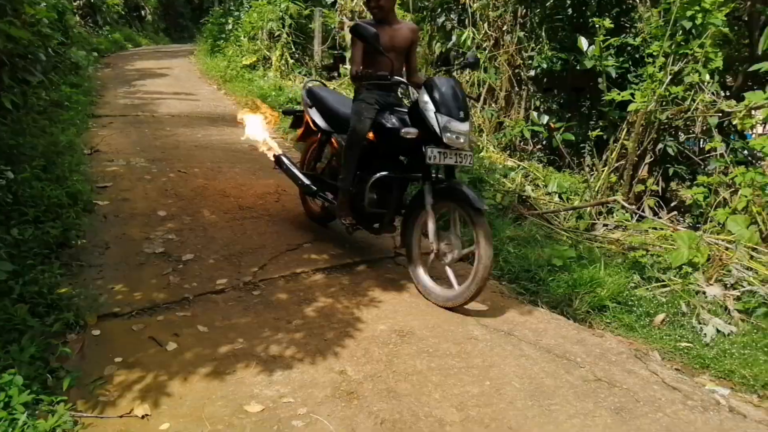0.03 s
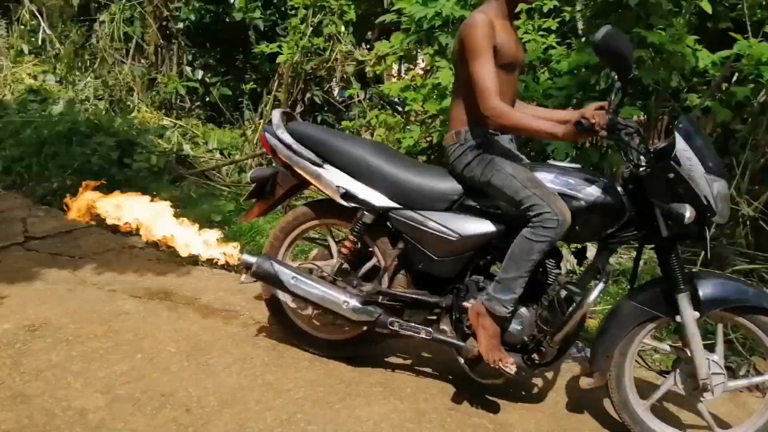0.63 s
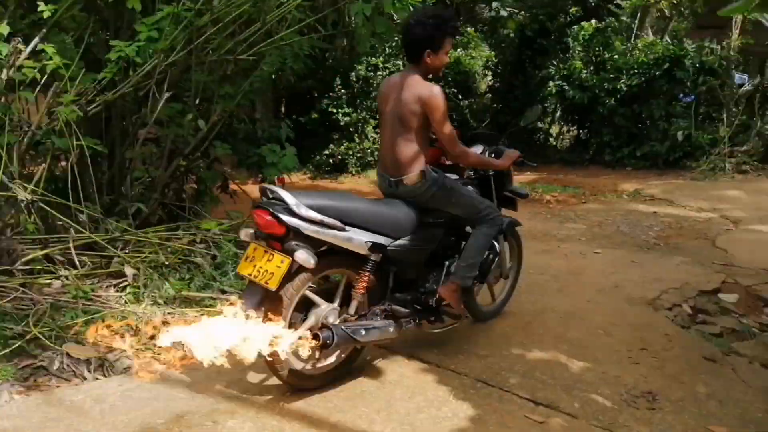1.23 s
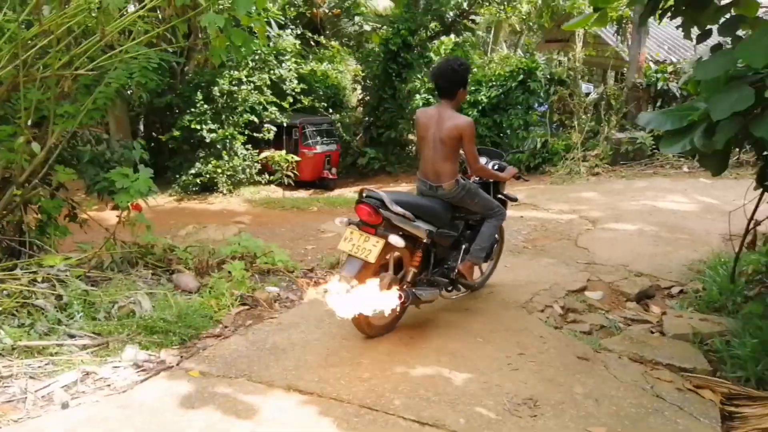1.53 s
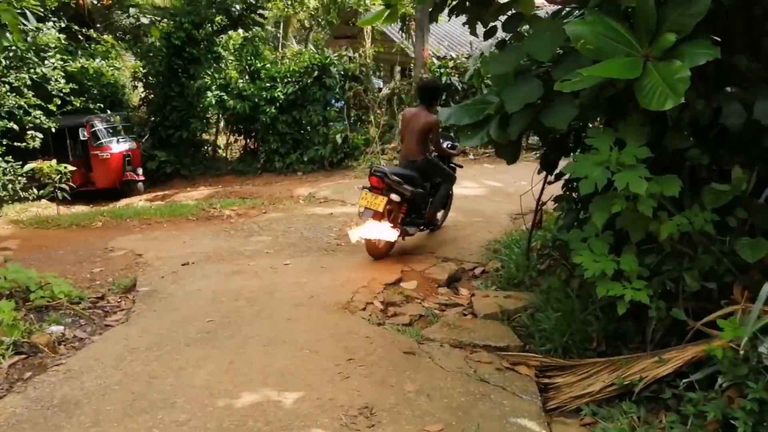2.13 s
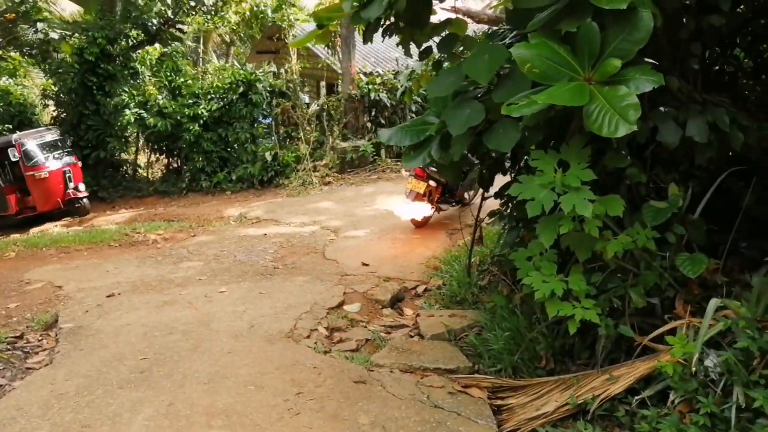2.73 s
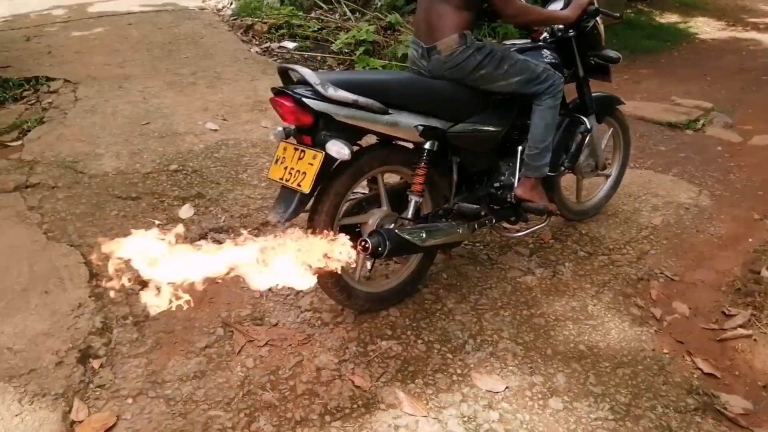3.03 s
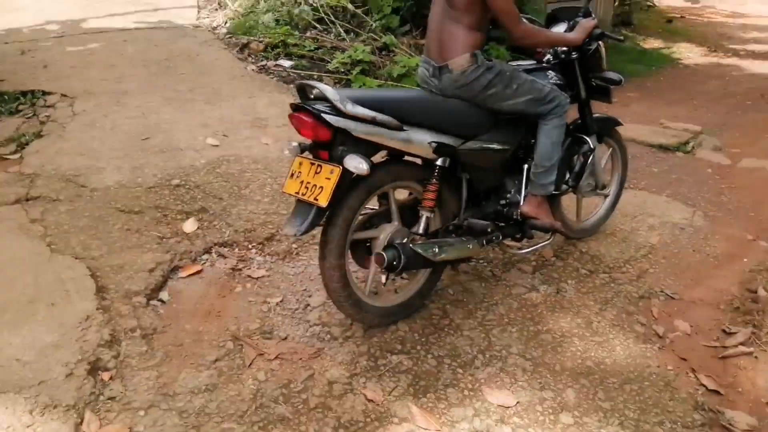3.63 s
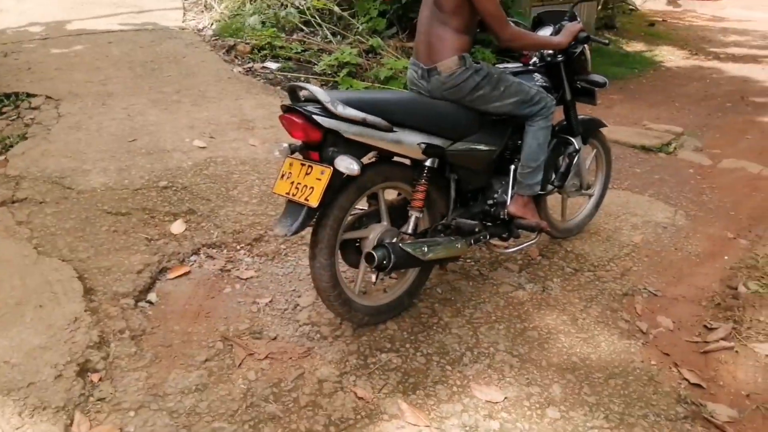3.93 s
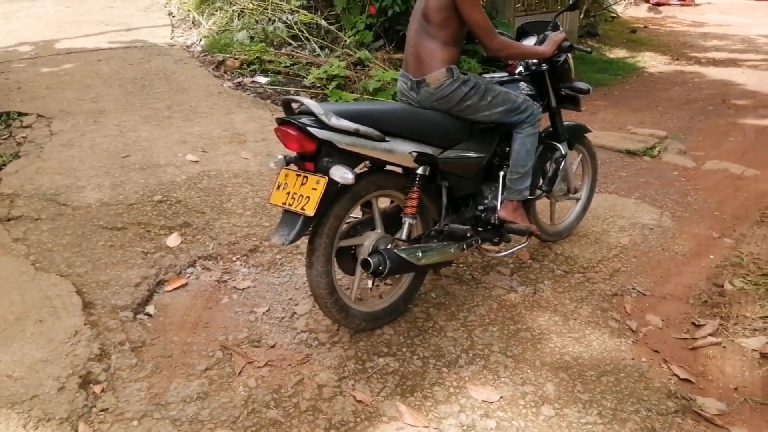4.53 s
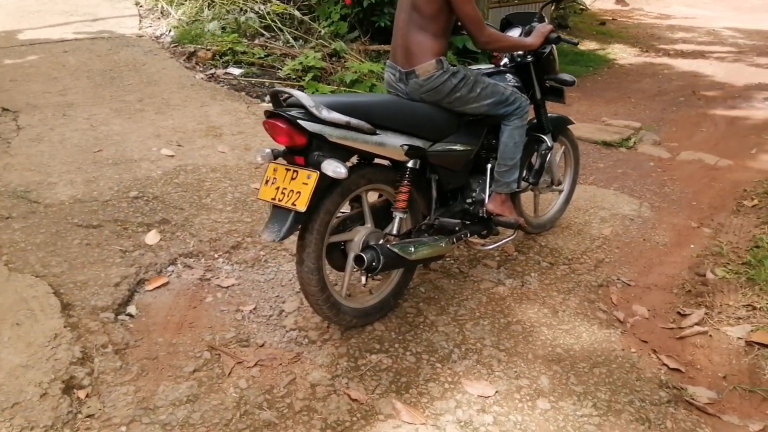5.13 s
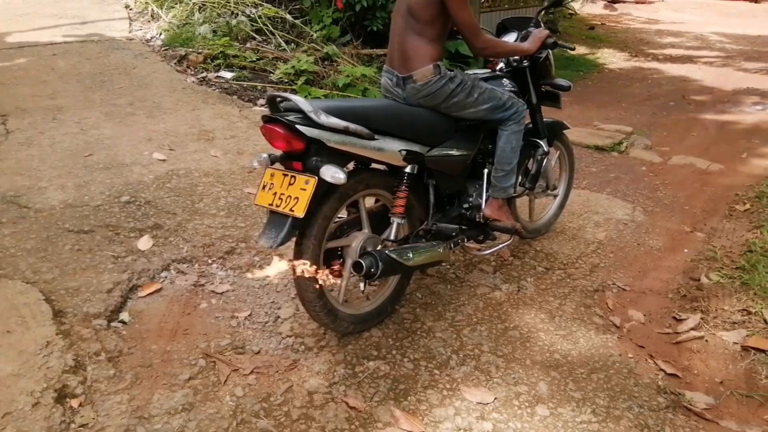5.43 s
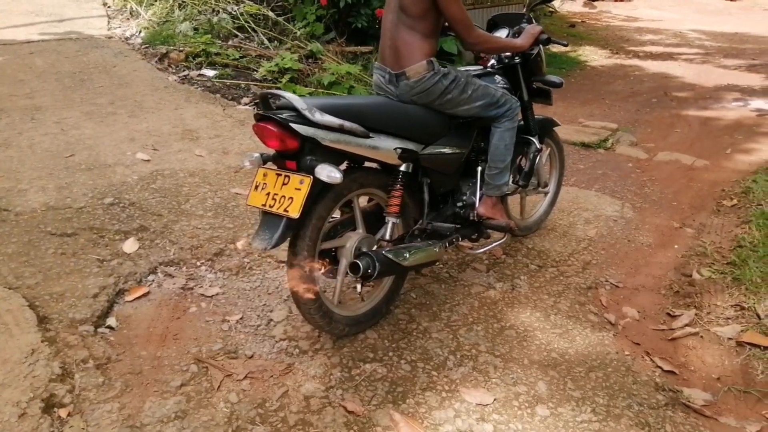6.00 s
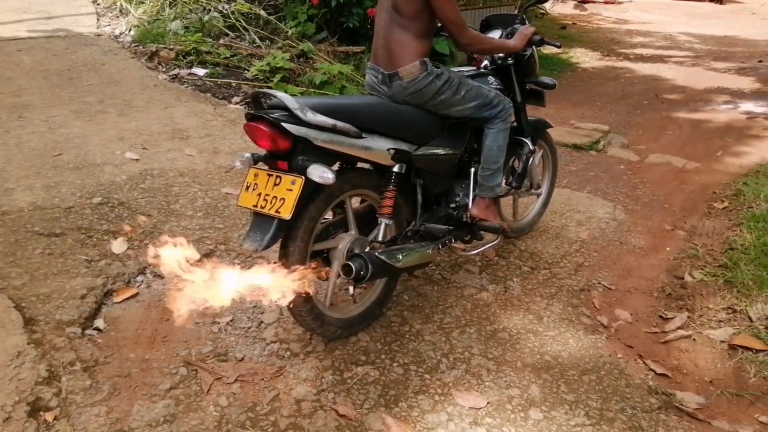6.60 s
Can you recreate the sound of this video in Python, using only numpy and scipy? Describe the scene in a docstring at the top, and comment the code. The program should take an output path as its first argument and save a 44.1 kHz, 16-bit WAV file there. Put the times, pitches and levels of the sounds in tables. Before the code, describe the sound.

A single-cylinder motorcycle fades in, puttering slowly past outdoors with clattering valves, a faint metallic ring and a low rumble of burning exhaust gas. It is closest just before 1 second, then moves away, giving soft double or triple pops around 1 and 2.1 seconds.

At about 2.8 seconds the sound cuts abruptly to the bike standing close by. The exhaust stutters with fiery pops, bangs at 2.9 and louder at 3.4, then crackles hard until 3.7. Meanwhile the engine is revved once, rising with a metallic rasp to a peak near 4 seconds. The throttle snaps shut and the pitch sinks gradually, with a humming tone and a thin gear whine.

From 5.3 seconds the sputtering returns over the slowing engine. A sharp backfire comes at 6.2, and four loud bangs follow quickly between 6.6 and 6.8, slightly overloading the microphone.

```python
"""A one-cylinder four-stroke motorcycle spits flames: it rolls past, then, after a sudden cut, stands
close by and is revved. Each engine cycle makes a puff of exhaust and a gulp of intake air, over
clattering valves; on the standing bike a gear also whines. Unburnt fuel lights in the silencer, in
stuttering runs and single bangs. The loudest bangs overload a phone's two microphones."""
import sys
import numpy as np
from scipy import signal
from scipy.fft import rfft, irfft, next_fast_len
from scipy.io import wavfile
from scipy.ndimage import uniform_filter1d

SR = 44100
rng = np.random.default_rng(int(sys.argv[2]) if len(sys.argv) > 2 else 0)


def persist_wave(psi):
    """Save psi, clipped to +-1, as 16-bit WAV."""
    counts = np.round(np.clip(psi, -1, 1) * 32767).astype(np.int16)
    wavfile.write(sys.argv[1], SR, np.atleast_2d(counts).T)


N = 298116
T = np.arange(N) / SR
STANDING_FROM_S = 2.772
REFERENCE_HZ = 50  # engine cycles a second; levels that follow the speed are set for this one

# Tone of burning gas: f/Hz, level/dB
FLAME_TONE = [(60, -31), (200, 9), (310, -15.5), (400, -1), (540, -2), (660, -2.5), (920, -13.5),
              (1200, -8.5), (1500, -17), (1900, -9.5), (2800, -35), (5000, -28), (15000, -46)]
# Tone of gas cracking out of the pipe: f/Hz, level/dB
CRACK_TONE = [(100, -52), (500, 14), (1500, -5.5), (3000, -4.5), (6000, -10), (10000, -14.5),
              (16000, -22.5)]
# Thin metal rings: start/s, end/s, f/Hz, bandwidth/Hz, level/dB, moment of the hit/cycles
METAL_RINGS = [(0.45, 1.95, 980, 170, -41, 0.1), (2.52, 2.77, 1560, 220, -45, -0.23),
               (2.88, 3.42, 1790, 160, -33, -0.43), (6.06, 6.24, 1090, 160, -35, -0.2)]
# Single backfires: t/s, thump level/dB, thump width/ms, crack level/dB
BACKFIRES = [(1.031, -12.5, 2.7, -43), (1.061, -14, 1.7, -33), (2.055, -18.5, 0.97, -59),
             (2.083, -13.5, 1.6, -61), (2.113, -18, 2.2, -54), (2.912, -1, 2.1, -27), (3.415, -7, 3.8, -15),
             (3.439, 5, 1.73, -17), (6.164, 0, 1.8, -20), (6.604, 3, 2.15, -15), (6.669, 1, 2.19, -16.5),
             (6.727, 4, 1.95, -18), (6.755, 1, 2.15, -16.5)]
# Runs of flares in the silencer: start/s, end/s, thump level/dB, flame level/dB,
# spit against flame/dB, exhaust boost/dB, thump width/ms, lean of the thump's wave
FLARE_RUNS = [(2.835, 3.405, -17.5, -18.5, -7.5, 7, 3.25, -0.62),
              (3.475, 3.697, -6.5, -8.5, -4.5, 12, 2.2, 0.4),
              (5.335, 5.778, -20.5, -20, -6, 9.5, 2.23, 0.42),
              (5.772, 6.068, -15, -15.5, -7.5, 6.5, 2.2, 0.49),
              (6.149, 6.57, -10.5, -15.5, -7.5, 3.5, 2.15, 0.26),
              (6.616, 6.761, -14, -14, -6.5, 2, 2.9, 0.34)]


def undb(db):
    """Turn decibels into a gain."""
    return 10 ** (np.asarray(db) / 20)


def unit(x):
    """Scale a signal to an average (rms) level of 1."""
    return x / np.sqrt(np.mean(x ** 2))


def noise():
    """White noise: an even hiss."""
    return rng.standard_normal(N)


def colour(x, tone):
    """Shape a sound by (f/Hz, level/dB) points; the filter rings only after a hit, never before."""
    size = next_fast_len(N + SR // 2)
    hz, db = np.transpose(tone)
    bin_hz = np.fft.rfftfreq(size, 1 / SR)
    log_gain = np.log(undb(np.interp(np.log(bin_hz + 1), np.log(hz), db)))
    # move the early half of the filter's response to after the hit
    cepstrum = irfft(log_gain, size) * (1 + np.sign(size / 2 - np.arange(size)))
    cepstrum[0] /= 2
    return irfft(rfft(x, size) * np.exp(rfft(cepstrum, size)), size)[..., :N]


def hiss(tone):
    """Noise of level 1 with the given tone."""
    return unit(colour(noise(), tone))


def spread(middle, other, split_hz=2300):
    """Left and right channels: alike in the bass, unrelated in the treble."""
    side = signal.sosfilt(signal.butter(1, split_hz, "high", fs=SR, output="sos"), other)
    return np.array([middle + side, middle - side])


def bump(u):
    """A bell-shaped swell around u = 0."""
    return np.exp(-u ** 2 / 2)


def strike(u):
    """The outline of a hit: starts at u = 0, peaks at u = 1, then dies away."""
    age = np.maximum(u, 0)
    return age * np.exp(1 - age)


def each_cycle(cycles, phase, scatter_db):
    """Seconds since the nearest once-a-cycle event (negative before it), and its random strength."""
    nearest = np.round(cycles[0] - phase).astype(int)
    since = (cycles[0] - phase - nearest) / cycles[1]
    return since, undb(scatter_db * rng.standard_normal(1024))[nearest]


def puff(u, lean=0.):
    """The pressure wave of a gas burst: push, deep dip, push. u is in widths; lean makes it lopsided."""
    return (u ** 2 - 1 + lean * u) * bump(u)


def puff_gain(hz, width_s):
    """The gain that brings hz puffs a second to an average level near 1."""
    return 1 / np.sqrt(hz * width_s * np.sqrt(np.pi) * 3 / 4)


def exhaust_and_intake(cycles, phase, width_ms, lean, edge, gas, intake, intake_ms, lag, scatter_db):
    """A puff of exhaust with its rush of gas, then, lag cycles later, a gulp of intake air."""
    since, strength = each_cycle(cycles, phase, scatter_db)
    u = since * 1000 / width_ms
    rush = gas * bump(u + .5) * hiss(FLAME_TONE)
    exhaust = strength * (puff(u, lean) + edge * puff(1.79 * u) + rush)  # a narrower puff adds edge
    since, strength = each_cycle(cycles, phase + lag, scatter_db)
    gulp = intake * strength * puff(since * 1000 / intake_ms)
    return (exhaust + gulp) * puff_gain(cycles[1], width_ms / 1000)


def burning_jet(facing):
    """The jet of burning gas rumbles; its higher bark is heard from behind the pipe."""
    # Tones of the rumble and the bark: f/Hz, level/dB
    rumble_tone = [(20, -21), (50, -3), (110, 0.5), (230, 0.5), (330, -6), (560, -24.5), (2000, -53)]
    bark_tone = [(180, -24), (380, 2.5), (450, -5.5), (560, -25), (2000, -46)]
    rumble = spread(hiss(rumble_tone), hiss(rumble_tone), split_hz=1200)
    return undb(-1) * rumble + undb(-10.5) * facing ** 3 * hiss(bark_tone)


def metal_taps(cycles):
    """Metal parts touch at the same 160 points of every cycle, never quite equally hard."""
    count, _ = cycles
    phases, strengths = rng.random(160), rng.standard_normal(160)
    tap_counts = (np.arange(int(count[-1]))[:, None] + phases).ravel()
    tap_s = np.interp(tap_counts, count, T)
    taps = np.bincount((tap_s * SR).astype(int), np.resize(strengths, len(tap_s)), N)
    return unit(taps * undb(3 * noise()))


def case_ringing(x):
    """The engine case and pipe ring at their own pitches when shaken."""
    # Resonances of the case and pipe: f/Hz, bandwidth/Hz, level/dB
    resonances = [(1320, 700, -26), (1880, 78, -2.5), (3160, 16, 12), (3660, 44, 8.5), (4220, 490, 4.5),
                  (4740, 21, 6), (5960, 34, 5.5)]
    return unit(sum(undb(db) * signal.lfilter(*signal.iirpeak(hz, hz / width, fs=SR), x)
                    for hz, width, db in resonances))


def clatter(cycles, taps, valve_phase, valve_depth, ring, lowest_hz):
    """Chain, valves and gears tap and hiss, louder when the valves move, and make the case ring."""
    # Tone of the moving parts: f/Hz, level/dB
    parts_tone = [(60, -43), (250, 7), (400, 2), (700, 0.5), (950, -4.5), (1300, -1), (1700, -4.5),
                  (2300, -6.5), (3200, -6), (4500, -11.5), (8000, -13.5), (12000, -19), (16000, -28)]
    since, strength = each_cycle(cycles, valve_phase, scatter_db=5)
    swell = 1 + valve_depth * strength * strike(since / 0.002)
    bass_cut = signal.butter(2, lowest_hz, "high", fs=SR, output="sos")  # small parts give little bass
    shakes = [signal.sosfilt(bass_cut, swell * (taps * metal_taps(cycles) + noise())) for _ in range(2)]
    rattles = [unit(colour(x, parts_tone)) + ring * case_ringing(x) for x in shakes]
    return unit(spread(*rattles)) * np.sqrt(2)


def metal_ring(cycles, start, end, ring_hz, width_hz, db, phase):
    """Metal struck once a cycle gives a thin ring that fades in at start and out at end."""
    since, strength = each_cycle(cycles, phase, scatter_db=2.5)
    age = np.maximum(since, 0)
    ring = np.sin(2 * np.pi * ring_hz * age + 4 * strength) * strike(np.pi * width_hz * age) * strength
    fade = uniform_filter1d(1. * ((T > start) & (T < end)), size=3000)
    return undb(db) * unit(ring) * fade


def rolling_bike():
    """The bike rolls slowly past; as it leaves, its pipe points at the listener."""
    # Engine speed: t/s, cycle rate/Hz
    speed = [(0.0, 42.13), (0.3, 39.97), (0.6, 39.44), (1.0, 38.33), (1.4, 36.95), (1.8, 37.06),
             (2.1, 36.55), (2.4, 37.52), (2.77, 32.34)]
    # Change in the clatter's tone while rolling: f/Hz, gain/dB
    rolling_tone = [(350, -6), (570, -7.5), (800, 3.5), (980, 3.5), (1250, -3.5), (1700, 2.5), (2300, 0.5),
                    (2800, -1.5), (9000, 3), (15000, 1)]
    passes_s, closest_m, metres_per_s = 0.7, 1.7, 3.36
    hz = np.interp(T, *np.transpose(speed))
    cycles = np.cumsum(hz) / SR, hz  # the engine's motion: cycles so far, cycles a second
    along_m = metres_per_s * (T - passes_s)
    distance_m = np.hypot(along_m, closest_m)
    near = closest_m / distance_m
    facing = (1 + along_m / distance_m) / 2  # 0 coming, 1 going: the puffs get louder and sharper
    pipe = exhaust_and_intake(cycles, phase=-0.4145, width_ms=1.46, lean=-0.91, edge=0.25 * facing,
                              gas=0.073, intake=0.6, intake_ms=2.19, lag=0.461, scatter_db=2.2)
    jet = burning_jet(facing)
    metal = clatter(cycles, taps=0.83, valve_phase=0.16, valve_depth=0.33, ring=0.074, lowest_hz=443)
    rings = sum(metal_ring(cycles, *row) for row in METAL_RINGS if row[0] < STANDING_FROM_S)
    exhaust_gain = undb(-27 + 4.5 * (facing - .5)) * near ** 0.71  # carries further than the clatter
    return exhaust_gain * (pipe + jet) + undb(-32) * near * colour(metal, rolling_tone) + rings


def backfires():
    """A whole charge of fuel explodes: a crack of gas at the pipe's mouth, then a flame and a thump."""
    thump, blaze, crack = np.zeros((3, N))
    for at_s, db, width_ms, crack_db in BACKFIRES:
        span = abs(T - at_s) < .06
        since = T[span] - at_s
        thump[span] += undb(db) * puff(since * 1000 / width_ms, lean=0.1)
        blaze[span] += undb(db) * bump((since + 0.0039) / 0.0044)
        crack[span] += undb(crack_db) * strike((since + 0.013) / 0.0066)
    gas = spread(hiss(CRACK_TONE), hiss(CRACK_TONE))
    return thump + undb(-18.5) * blaze * hiss(FLAME_TONE) + crack * gas


def wander(samples):
    """A random drift of size about 1, smoothed over this many samples."""
    return unit(uniform_filter1d(uniform_filter1d(noise(), samples), samples))


def drone(count):
    """The engine's overtones, each wavering on its own, slide through the silencer's resonances."""
    # Engine overtones: multiple of the cycle rate, level/dB
    overtones = [(3, -1), (4, -5.5), (5, -16), (6, -4), (7, -12), (8, -5), (9, -9), (10, -4.5), (11, -11),
                 (12, -5), (13, -12), (14, -11), (16, -10), (17, -4), (18, -9), (21, -14)]
    # Tone of the silencer: f/Hz, gain/dB
    silencer_tone = [(130, 1.5), (185, 7), (230, -1), (300, 3), (430, 4), (620, 3), (800, 2.5), (1000, -2),
                     (1300, -2)]
    hum = 0
    for multiple, db in overtones:
        gain = undb(db + 2 * wander(4000))
        hum += gain * np.sin(2 * np.pi * (multiple * count + rng.random()) + .2 * wander(1000))
    return colour(unit(hum), silencer_tone)


def gear_whine(count, teeth=28):
    """Meshing gear teeth whine, swelling as their pitch slides through a resonance of the case."""
    # Loudness of the whine at each pitch: f/Hz, level/dB
    whine_levels = [(900, -43), (1200, -35.5), (1380, -27), (1500, -41), (2000, -32), (2400, -36.5)]
    angle = 2 * np.pi * count
    return colour(np.sin(teeth * angle + 0.55 * wander(600) + 0.69 * np.sin(angle)), whine_levels)


def afterfire(cycles):
    """Fuel lights in the hot silencer once a cycle: a spit of gas, then a thump with a burst of flame."""
    since, strength = each_cycle(cycles, phase=0., scatter_db=1.8)
    lit_s = T - since
    # no flare where the charge goes off as a single backfire
    spent = np.min([abs(lit_s - bang[0]) for bang in BACKFIRES], axis=0) < .011
    flame = bump((since + 0.001) / 0.0028) * hiss(FLAME_TONE)
    spit = strike((since + 0.0089) / 0.0021) * spread(hiss(CRACK_TONE), hiss(CRACK_TONE))
    flares = 0
    for start, end, thump_db, flame_db, spit_db, _, width_ms, lean in FLARE_RUNS:
        width_s = width_ms / 1000
        thump = undb(thump_db) * puff(since / width_s, lean) * puff_gain(cycles[1], width_s)
        roar = undb(flame_db) * (flame + undb(spit_db) * spit)
        flares += (lit_s > start) * (lit_s < end) * (thump + roar)
    return flares * strength * ~spent


def throttle_blip():
    """Throttle and engine load (0-1) rise together; the throttle snaps shut, the load dies away."""
    opens_s, full_s, released_s = 3.26, 3.74, 3.95
    shut_s, load_fade_s = 0.016, 0.2
    opening = np.clip((T - opens_s) / (full_s - opens_s), 0, 1)
    since = np.maximum(T - released_s, 0)
    return opening * np.clip(1 - since / shut_s, 0, 1), opening * np.exp(-since / load_fade_s)


def combustion_knock(cycles, octaves):
    """Hard-burning fuel raps the case once a cycle; at high speed the rap gains a metallic edge."""
    # Tones of the rap and of its edge: f/Hz, level/dB
    rap_tone = [(200, -23), (700, -19), (1300, 17.5), (1650, -1), (2000, 13.5), (3000, -8), (4500, -7),
                (6500, -25), (10000, -6.5), (16000, -14)]
    edge_tone = [(2500, -34), (3900, -10), (4250, 5.5), (4600, -7), (4900, 0), (5400, -14), (6100, -1.5),
                 (6700, -34), (10000, -28)]
    since, _ = each_cycle(cycles, phase=0.35, scatter_db=0)
    shakes = [metal_taps(cycles) + 1.3 * noise() for _ in range(2)]
    rap = spread(*(unit(colour(x, rap_tone)) + 0.41 * case_ringing(x) for x in shakes))
    edge = spread(*(unit(colour(x, edge_tone)) for x in shakes))
    return (undb(-18) * rap + undb(-41 + 32.5 * octaves) * edge) * strike(since / 0.0024)


def standing_bike():
    """The bike stands close by; it is revved once, then the engine slows down."""
    # Engine speed: t/s, cycle rate/Hz
    speed = [(2.77, 53.5), (2.92, 46.72), (3.25, 41.56), (3.45, 41.55), (3.59, 49.43), (3.78, 66.6),
             (3.96, 76.06), (4.32, 66.95), (4.54, 62.4), (5.15, 50.54), (5.33, 48.1), (5.65, 42.2),
             (6.44, 29.93), (6.6, 30.64), (6.76, 36.94)]
    hz = np.interp(T, *np.transpose(speed))
    count = np.cumsum(hz * (T >= STANDING_FROM_S)) / SR
    cycles = count, hz
    octaves = np.log2(hz / REFERENCE_HZ)  # +1 for each doubling of speed
    throttle, load = throttle_blip()
    flare_db = sum(db * (T > start) * (T < end) for start, end, _, _, _, db, _, _ in FLARE_RUNS)
    boost_db = np.maximum(14 * load, uniform_filter1d(1. * flare_db, size=900))
    pipe_gain = undb(-28.5 - 6.5 * octaves + boost_db)  # a slower engine gives fuller puffs
    metal_gain = undb(-30 + 9.5 * octaves + 4 * throttle)
    pipe = exhaust_and_intake(cycles, phase=-0.314, width_ms=2.11, lean=0.067, edge=0.007, gas=0.16,
                              intake=0.36 + 0.46 * load, intake_ms=1.4, lag=0.517, scatter_db=1.67)
    metal = clatter(cycles, taps=0.44, valve_phase=0.47, valve_depth=0.25, ring=0.21, lowest_hz=855)
    hum = undb(-35 + 16 * octaves) * drone(count)
    whine = gear_whine(count)
    knock = throttle * combustion_knock(cycles, octaves)
    rings = sum(metal_ring(cycles, *row) for row in METAL_RINGS if row[0] > STANDING_FROM_S)
    return pipe_gain * pipe + metal_gain * metal + hum + whine + knock + rings + afterfire(cycles)


def scene():
    """First the ride past, then all at once the standing bike, with backfires in both."""
    return np.where(T < STANDING_FROM_S, rolling_bike(), standing_bike()) + backfires()


def record(dry):
    """Each microphone opening has its own treble resonance; loud bangs are squashed; the start fades in."""
    # Tones of the two microphone openings: f/Hz, gain/dB
    left_tone = [(100, 0), (1500, 0), (3000, -2), (5000, -6.5), (7000, 0.5), (8300, 6), (9300, 13.5),
                 (10500, 5), (12000, 0), (16000, 0)]
    right_tone = [(100, 1), (1500, 2), (4500, 0.5), (5800, 9.5), (7000, 3), (10000, -4), (13000, -1),
                  (16000, 3.5)]
    fade_from_s, fade_s, top_hz = 0.07, 0.28, 15800
    x = np.array([colour(dry[0], left_tone), colour(dry[1], right_tone)])
    x = .97 * x / (1 + x ** 6) ** (1 / 6)  # overload flattens the peaks
    x = x * np.clip((T - fade_from_s) / fade_s, 0, 1)
    return signal.sosfiltfilt(signal.ellip(8, .1, 50, top_hz, fs=SR, output="sos"), x)


dry = scene()
out = record(dry)
persist_wave(out)
```